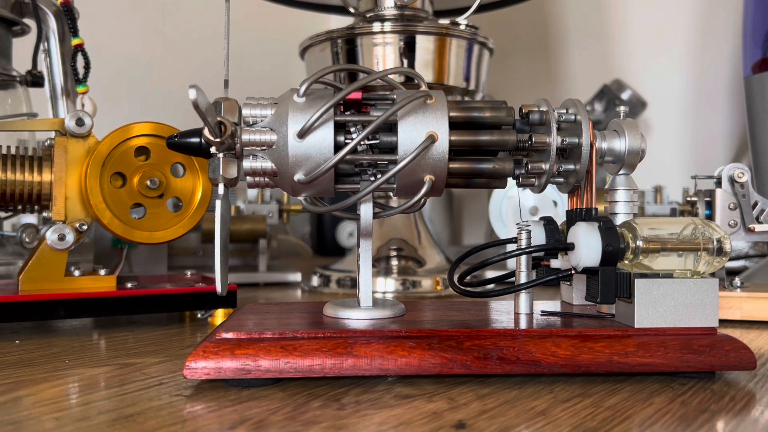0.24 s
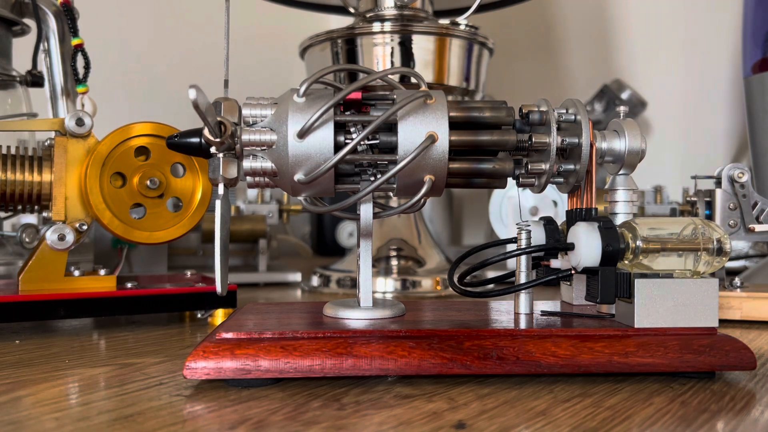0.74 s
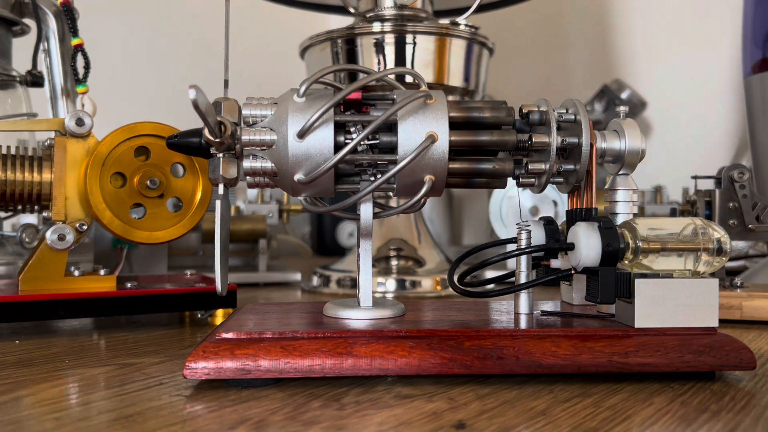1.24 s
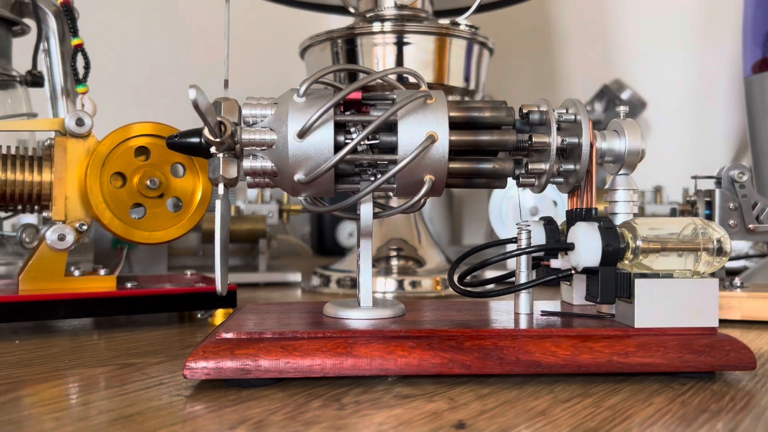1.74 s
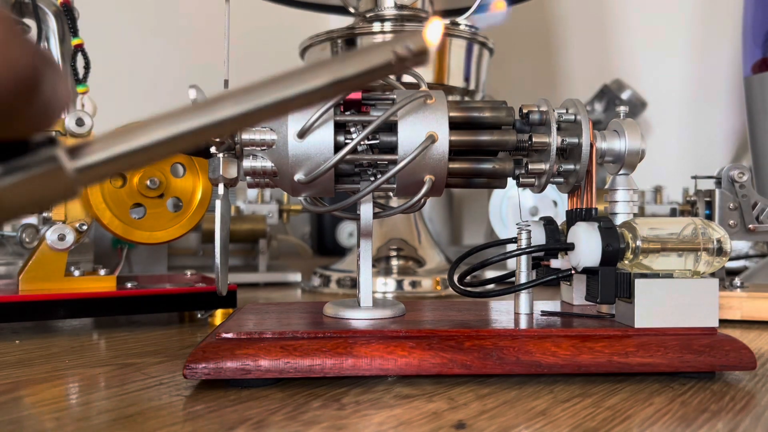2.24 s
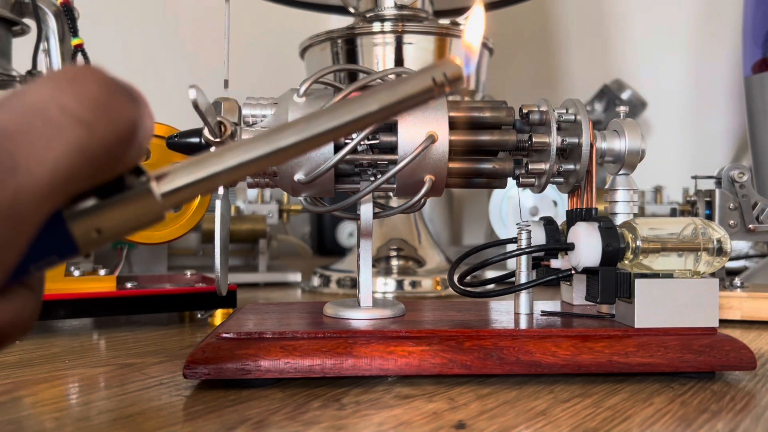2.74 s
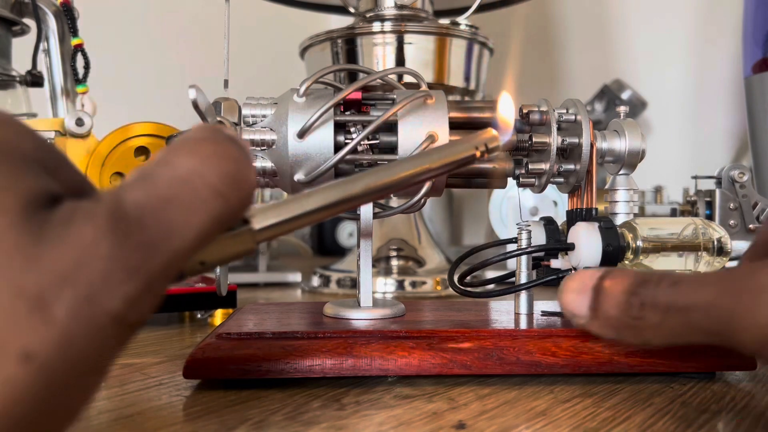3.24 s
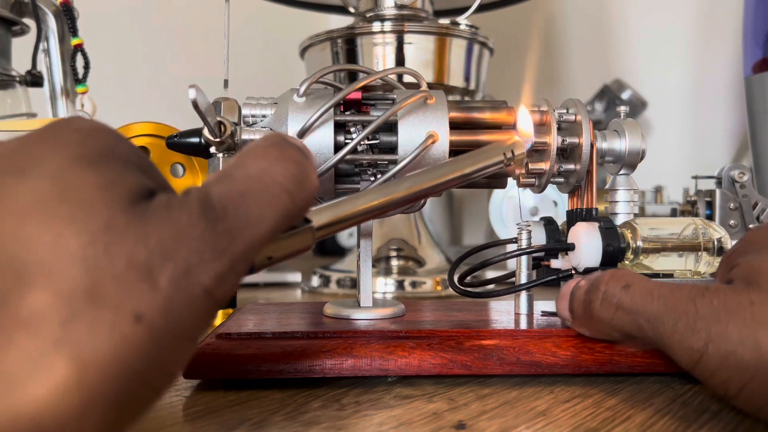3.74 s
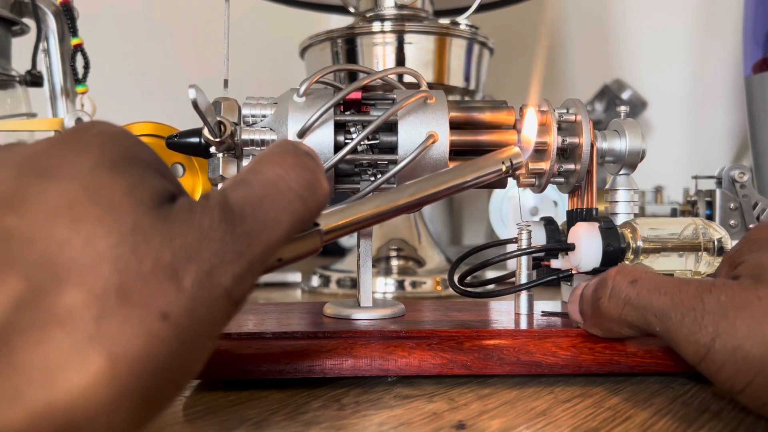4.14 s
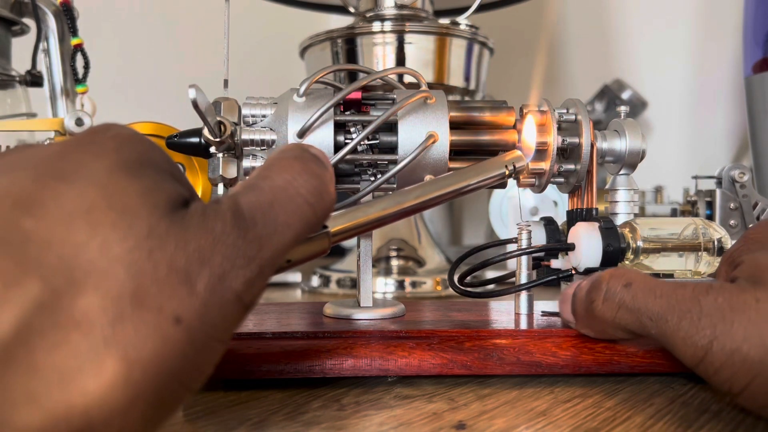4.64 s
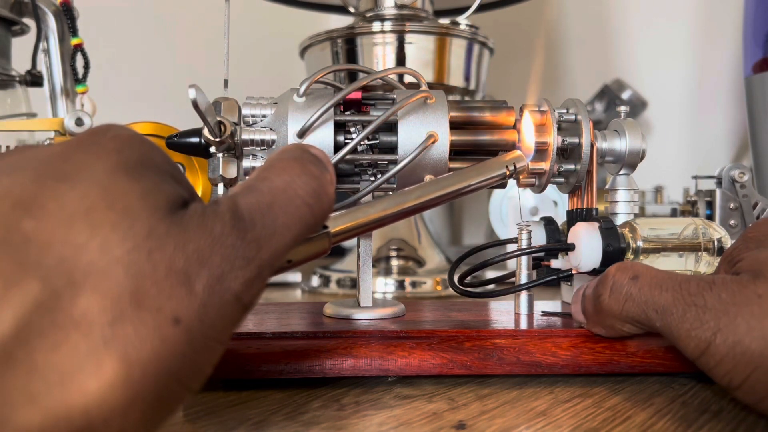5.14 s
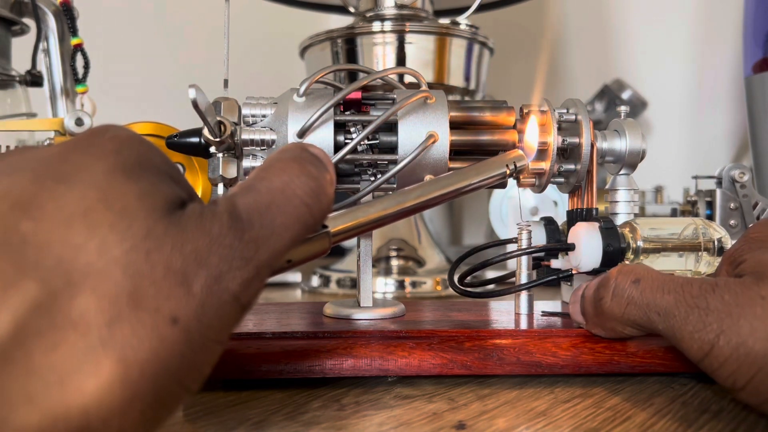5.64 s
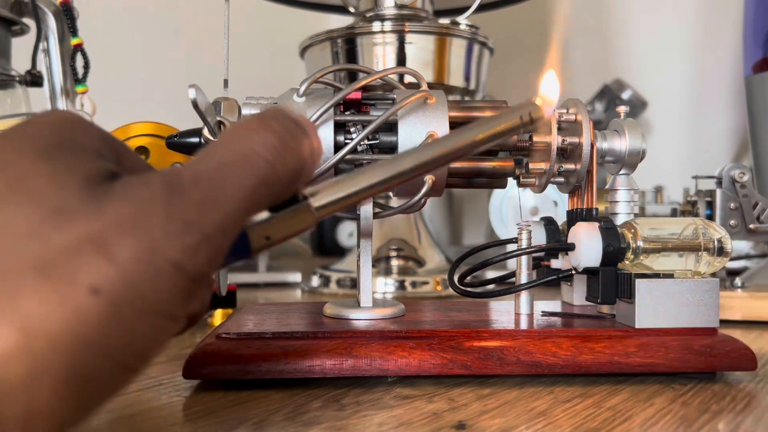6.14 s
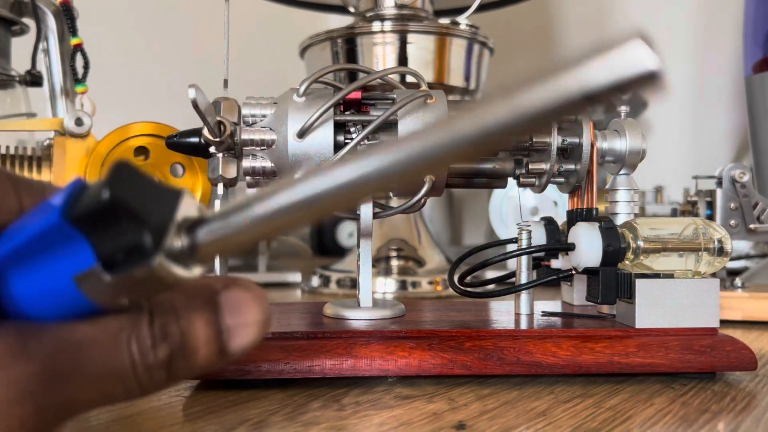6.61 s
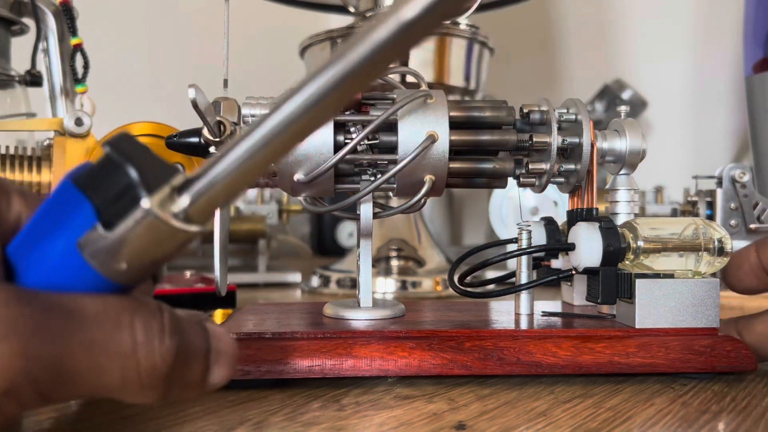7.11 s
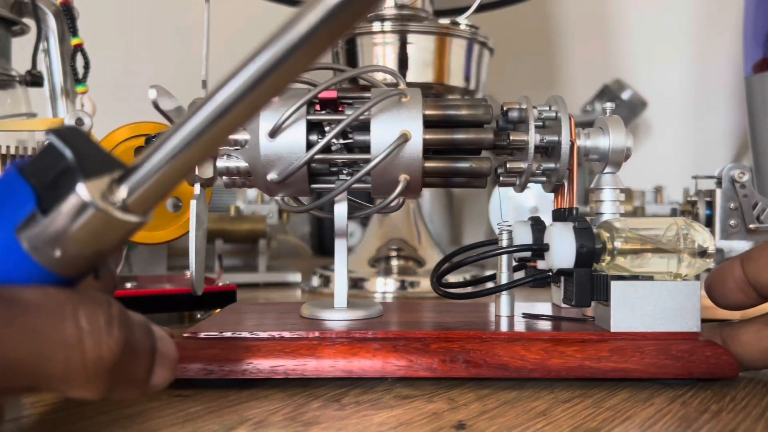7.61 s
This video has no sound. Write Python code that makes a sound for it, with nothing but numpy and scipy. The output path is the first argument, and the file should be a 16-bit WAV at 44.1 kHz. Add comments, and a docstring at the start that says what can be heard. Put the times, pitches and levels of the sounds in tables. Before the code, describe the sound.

In a quiet live room, a gas lighter clicks alight with a hiss, a stiff metal catch snaps four times, then the lighter clicks off.

```python
"""A long gas lighter is picked up, clicked alight and let go, close to a phone in a quiet, live room:
struck modes for its hammer and small contacts, shaped noise for its gas. A stiff catch on a metal model
snaps four times: ringing modes, cracks and a diffuse tail. Sleeves and skin rustle as swelling noise,
knocks ring the table top, dull thuds through the building ring wall modes, over low rumble and hiss."""
import sys
import numpy as np
from scipy import signal
from scipy.fft import rfft, irfft, next_fast_len
from scipy.io import wavfile
from scipy.ndimage import uniform_filter1d

SR = 44100
rng = np.random.default_rng(int(sys.argv[2]) if len(sys.argv) > 2 else 0)


def int16_out(signal):
    """Quantize to a 16-bit WAV file."""
    q = np.round(np.clip(np.atleast_2d(signal).T, -1, 1) * 32767)
    wavfile.write(sys.argv[1], SR, q.astype(np.int16))


N = 347063


def amp(db):
    """Amplitude gain from dB."""
    return 10 ** (np.asarray(db) / 20)


def unit(x):
    """Scale to rms 1."""
    return x / np.sqrt(np.mean(x ** 2) + 1e-20)


def along(points, hz):
    """Interpolate (freq_hz, value) points on a log frequency axis."""
    point_hz, value = np.transpose(points)
    return np.interp(np.log(hz + 1), np.log(point_hz + 1), value)


def filtered(x, response):
    """Apply a complex frequency response by FFT, zero-padded."""
    size = next_fast_len(x.shape[-1] + 8192)
    spectrum = rfft(x, size) * response(np.fft.rfftfreq(size, 1 / SR))
    return irfft(spectrum, size)[..., :x.shape[-1]]


# left-right correlation of diffuse sound: freq_hz, correlation (-1 to 1)
PORT_CORRELATION = [(30, 1), (80, 0.93), (250, 0.81), (600, 0.1), (1500, 0.48), (3000, 0.27), (6000, 0.06),
                    (8000, 0.92), (10000, 1), (11700, 1), (13500, 0.72)]


def diffuse(pair, spectrum):
    """Colour two independent signals and mix them to the port correlation of a diffuse field."""
    def response(hz):
        angle = np.arccos(np.clip(along(PORT_CORRELATION, hz), -1, 1)) / 2
        return amp(along(spectrum, hz)) * np.array([np.cos(angle), np.sin(angle)])

    mid, side = filtered(pair, response)
    return np.array([mid + side, mid - side])


def rush(spectrum, patchy_db):
    """Diffuse noise of rms 1: spectral shape plus random gain patches in time and frequency."""
    z = signal.stft(rng.standard_normal((2, N)), nperseg=512)[2]
    patches = uniform_filter1d(rng.standard_normal(z.shape[1:]), 8, axis=0)
    patches = uniform_filter1d(patches, 6, axis=1)
    pair = signal.istft(z * amp(patchy_db * unit(patches)), nperseg=512)[1][:, :N]
    return unit(diffuse(pair, [(0.82, -120)] + list(spectrum) + [(21000, -120)]))


def swells(rows, sag_db_per_s, fade_db_per_s):
    """Summed event gain: power rises linearly, sags through the hold, then fades."""
    t = np.arange(0, N / SR, .001)
    start_s, rise_s, hold_s, level_db = np.transpose(rows)[:, :, None]
    held_s = np.clip(t - start_s - rise_s, 0, hold_s)
    after_s = np.maximum(t - start_s - rise_s - hold_s, 0)
    gain = amp(level_db - sag_db_per_s * held_s - fade_db_per_s * after_s)
    power = np.clip((t - start_s) / rise_s, 0, 1) * gain ** 2
    return np.interp(np.arange(N) / SR, t, np.sqrt(power.sum(axis=0)))


# reverberation: freq_hz, t60_s
ROOM_T60 = [(150, 0.27), (800, 0.71), (2000, 0.59), (5500, 0.64), (9000, 0.52), (14000, 0.2)]


def room(x, first_wall_s, build_s, size):
    """Convolve with a random diffuse tail: silent to the first wall, then build-up and decay by band."""
    hz, t, z = signal.stft(rng.standard_normal((2, size)), SR, nperseg=256)
    decay = amp(-60 * t / along(ROOM_T60, hz)[:, None])
    tail = signal.istft(z * decay, SR, nperseg=256)[1]
    late_s = np.maximum(np.arange(tail.shape[1]) / SR - first_wall_s, 0)
    tail = diffuse(tail * (1 - np.exp(-late_s / build_s)), [(1, 0)])
    return signal.fftconvolve(x[None], tail / np.linalg.norm(tail[0]), axes=1)


# table and air resonances under a blow: freq_hz, width_hz, relative_db
THUMP_MODES = [(72, 16, 11), (121, 42, 5.5), (340, 110, -1)]
FAVOUR_WIDTH_OCTAVES = 0.33


def clicks(table, modes, colour, favour_db, thump_db, room_db, rattle_s, crack_db, spread_db,
           small_hz, size=32000):
    """Blows: a short contact rattle rings the part, thumps the table and fills the room."""
    out = np.zeros((2, N + 2 * SR))
    t = np.arange(4000) / SR
    hz, mode_db, t60_s, away_db = np.transpose(modes)[:, :, None]

    def body(f):
        total = 0
        for k, (centre_hz, width_hz, level_db) in enumerate(THUMP_MODES):
            damping = 1j * f * width_hz
            total = total + (-1) ** k * amp(level_db) * damping / (centre_hz ** 2 - f * f + damping)
        return total * (1j * f / (55 + 1j * f)) ** 4  # low cut delays the deepest part

    thump = filtered(np.exp(-t / .0004), body)
    thump = thump / np.abs(thump).max()

    def small(f):
        """Small parts radiate little bass."""
        return (1j * f / (small_hz + 1j * f)) ** 3

    def octaves(f, from_hz):
        return np.log2(np.clip(f, 1200, 13000) / from_hz)

    for start_s, level_db, favoured_hz, bright_db_per_octave in table:
        def tint(f):
            favour = np.exp(-.5 * (octaves(f, favoured_hz) / FAVOUR_WIDTH_OCTAVES) ** 2)
            return amp(along(colour, f) + bright_db_per_octave * octaves(f, 3200) + favour_db * favour)

        # random mode onsets; high modes tend to start sooner and rise faster
        rise_s = rattle_s * np.minimum(4000 / hz, 1.5)
        since_s = np.maximum(t - rise_s * rng.random(hz.shape), 0)
        envelope = amp(mode_db - 60 * since_s / t60_s) * (1 - np.exp(-since_s / rise_s))
        ring = envelope * tint(hz) * np.sin(2 * np.pi * hz * since_s)

        # direct crack: noise burst; crack into the room: impulse
        crack = rng.standard_normal(len(t)) * t / rattle_s * np.exp(-t / rattle_s)
        near = ring.sum(axis=0) + amp(crack_db) * filtered(crack, tint)
        spread = filtered(signal.unit_impulse(len(t), 60), tint)
        around = (amp(away_db) * ring).sum(axis=0) + amp(spread_db) * spread

        push = amp(level_db + thump_db) * thump
        at = round((start_s + .0012) * SR)
        out[:, at:at + len(t)] += amp(level_db + 4.5) * filtered(near, small) + push
        sent = amp(level_db + 6.5) * filtered(around, small) + 0.91 * push
        wet = amp(room_db) * room(sent, first_wall_s=0.0013, build_s=0.0035, size=size)
        out[:, at:at + wet.shape[1]] += wet
    return out[:, :N]


# rumble level: time_s, level_db
RUMBLE_LEVEL = [(0.0, -58.5), (0.39, -53), (0.7, -61), (1.01, -60), (1.44, -58), (1.6, -55.5), (2.43, -59),
                (2.61, -59), (7.87, -60)]
# noise shapes: freq_hz, relative_density_db (per Hz)
RUMBLE_SPECTRUM = [(21, -32), (36, -3), (63, -0.5), (101, -15), (123, -8), (154, -16.5), (222, -8.5),
                   (249, -14.5), (469, -21), (1010, -30), (1400, -32), (1570, -31.5), (1970, -37),
                   (2090, -36), (3500, -54), (4550, -87.5), (7700, -120)]
HISS_SPECTRUM = [(1500, -23), (3000, -1.5), (6000, -8), (8500, -9), (10000, -19), (12000, -1), (14500, -7),
                 (16500, -22)]


def rumble_and_hiss():
    """Low rumble of varying level plus steady microphone hiss, both shaped noise."""
    time_s, level_db = np.transpose(RUMBLE_LEVEL)
    rumble_db = np.interp(np.arange(N) / SR, time_s, level_db)
    rumble = amp(rumble_db) * rush(RUMBLE_SPECTRUM, patchy_db=1.5)
    return rumble + amp(-82.5) * rush(HISS_SPECTRUM, patchy_db=0.1)


# sleeve strokes, dull cloth folds, skin sliding on wood: start_s, rise_s, hold_s, level_db
SLEEVE_STROKES = [(0, 0.0019, 0.042, -67.5), (.055, 0.094, 0.21, -57), (.59, 0.027, 0.044, -73.5),
                  (.67, 0.0061, 0.0074, -66.5), (.83, .05, .02, -76.5), (.9, 0.041, 0.048, -61),
                  (1.1, 0.095, 0.041, -72), (1.26, 0.0045, 0.0062, -66.5), (1.32, 0.024, 0.1, -77),
                  (1.49, 0.066, 0.043, -71.5), (1.745, .008, .01, -63), (1.86, 0.026, .03, -73),
                  (3.76, .02, .01, -80), (6.51, 0.016, 0.0074, -70.5), (6.692, .006, .004, -85)]
CLOTH_FOLDS = [(1.2, .06, 0.034, -65), (1.5, .04, .01, -68), (1.87, .03, 0.018, -68),
               (2.83, .05, 0.052, -70), (3.2, .1, 0.084, -84.5), (3.445, .015, 0.092, -63),
               (3.74, .04, .01, -69.5), (6.78, .04, 0.039, -68.5), (6.92, .07, 0.032, -67.5)]
SKIN_SLIDES = [(6.96, 0.018, 0.029, -77), (7.41, 0.046, 0.058, -62), (7.56, 0.038, 0.017, -67),
               (7.68, 0.027, 0.012, -74.5)]
# noise shapes: freq_hz, relative_density_db (per Hz)
RUB_SPECTRUM = [(1200, -33), (2200, 1.5), (4500, -0.35), (7000, -5), (9500, -16.5), (12000, -40.5)]
CLOTH_SPECTRUM = [(300, -31.5), (600, -0.3), (1200, -6.5), (2200, -11), (3500, -37.5)]
SKIN_SPECTRUM = [(5000, -36), (8000, 0.5), (10000, -11), (12500, 1.5), (15000, -6), (17000, -27.5)]
# side noises: cloth and skin under a stroke, rub under a slide
STROKE_CLOTH_DB, STROKE_SKIN_DB, SLIDE_RUB_DB = -1.5, -7.5, -6.5
FADE_DB_PER_S, SLIDE_FADE_DB_PER_S = 115, 252


def hands():
    """Friction noise: cloth folds dully, fabric rubs, skin slides with a bright hiss; powers add."""
    strokes = swells(SLEEVE_STROKES, 0, FADE_DB_PER_S)
    folds = swells(CLOTH_FOLDS, 0, FADE_DB_PER_S)
    slides = swells(SKIN_SLIDES, 0, SLIDE_FADE_DB_PER_S)
    rub = np.hypot(strokes, amp(SLIDE_RUB_DB) * slides) * rush(RUB_SPECTRUM, patchy_db=2.0)
    cloth = np.hypot(folds, amp(STROKE_CLOTH_DB) * strokes) * rush(CLOTH_SPECTRUM, patchy_db=4.5)
    skin = np.hypot(slides, amp(STROKE_SKIN_DB) * strokes) * rush(SKIN_SPECTRUM, patchy_db=3.0)
    return rub + cloth + skin


# far blows: start_s, level_db (nominal), upper_modes_db (above 400 Hz)
FAR_THUDS = [(0.249, -45, 4.5), (1.269, -45, -4.5), (1.525, -50, -5.5), (1.89, -41.5, -6),
             (2.424, -39.5, -19), (5.136, -50, -6.5), (6.19, -50, -14), (6.984, -57, -0.5)]
# wall and floor modes: freq_hz, relative_db, t60_s
WALL_MODES = [(68, 5, .6), (128, -5.5, 0.66), (167.5, -6, 1), (218, 3.9, 0.64), (294, -6.5, 0.92),
              (388, -11, 0.56), (401, 7, 0.17), (486, -3, 0.95), (550, -5.5, 0.39), (606, -1, .4),
              (662, 7, 0.23), (757, -1.5, 0.66), (858, 6.5, 0.1)]


def thuds():
    """Far blows ring wall and floor modes; soft onset, random phase drift per port gives uneven beats."""
    out = np.zeros((2, N + SR))
    t = np.arange(SR // 2) / SR
    hz, mode_db, t60_s = np.transpose(WALL_MODES)[:, :, None]
    for start_s, level_db, upper_db in FAR_THUDS:
        scatter_db = rng.normal(0, 2.5, hz.shape)
        strength = amp(level_db - 11.5 + mode_db + upper_db * (hz > 400) + scatter_db)
        steps = rng.normal(0, 0.018, (2, len(hz), len(t)))
        drift = np.cumsum(steps, axis=2) * np.sqrt(hz / 400)
        phase = 2 * np.pi * (hz * t + rng.random(hz.shape)) + drift
        ring = strength * amp(-60 * t / t60_s) * np.sin(phase)
        at = round(start_s * SR)
        out[:, at:at + len(t)] += ring.sum(axis=1) * (1 - np.exp(-t / 0.0164))
    return out[:, :N]


# trigger, spring and handle contacts; spark hammer:
# start_s, level_db (nominal), favoured_pitch_hz, brightness_db_per_octave
LIGHTER_TICKS = [(0.6816, -51, 1780, 0), (1.264, -50.5, 4500, -4), (1.5431, -49.5, 2270, -6),
                 (1.5617, -52, 4960, 0.5), (1.5776, -49, 5930, 1), (1.5974, -50.5, 7200, 0.5),
                 (1.7493, -39.5, 2130, -3.5), (1.9304, -53, 7440, 3.5), (2.0456, -43.5, 3150, 0),
                 (2.0747, -58.5, 7400, 3), (2.0995, -53.5, 2500, 1), (2.117, -45, 2503, -0.5),
                 (2.1677, -32.5, 3135, 5), (6.0952, -31.5, 3600, 1.5), (6.1515, -18, 3800, 2),
                 (6.2234, -44.5, 3200, -1.5), (6.2341, -46, 3250, -0.5), (6.3431, -42, 3700, -1),
                 (6.351, -51, 3175, -5), (6.5154, -54, 3000, -3), (6.544, -44.5, 1200, 0.5),
                 (6.5577, -41, 5700, -1.5)]
SPARK_HAMMER = [(2.2033, -2.5, 3200, 0.0024)]
# lighter modes: freq_hz, relative_db, t60_s, toward_walls_db (relative to toward the phone)
LIGHTER_BODY_MODES = [(1221, 8.6, 0.013, -2), (1970, 2.8, 0.0063, 4.5), (2910, 7.9, 0.01, -6.5),
                      (3680, 9, 0.0093, -8.5), (4000, 14, 0.0029, -7.5), (5200, 5, .004, 8.5),
                      (9000, 11, 0.0014, -2), (11400, 6.1, 0.0041, -3), (13900, 9.3, .002, -1.5)]
# strike strength: freq_hz, relative_db
SPARK_STRIKE = [(1200, -22.5), (1600, -18.5), (2100, -26), (2900, -12.5), (4000, -24.5), (5300, -21.5),
                (7300, -23.5), (13000, -12.5)]
TICK_STRIKE = [(1200, -13.5), (1700, -16.5), (3200, -18), (5000, -27), (7300, -19.5), (13000, -19)]
# gas as the flame catches and as the valve closes: start_s, rise_s, hold_s, level_db
GAS_PUFFS = [(2.2, 0.0036, 0.39, -50), (5.97, .03, .07, -68)]
# gas noise shape: freq_hz, relative_density_db (per Hz)
GAS_SPECTRUM = [(500, -32.5), (1500, -5.5), (3000, -18), (6000, 2.5), (9000, -8.5), (13000, -8),
                (16500, -29)]
GAS_SAG_DB_PER_S, GAS_FADE_DB_PER_S = 46.5, 167


def lighter():
    """Spark hammer and small contacts ring the lighter body; gas is swelling turbulent noise."""
    body = dict(rattle_s=0.00057, small_hz=800)
    spark = clicks(SPARK_HAMMER, LIGHTER_BODY_MODES, SPARK_STRIKE, favour_db=0.5, thump_db=-30.5,
                   room_db=-7, crack_db=9.5, spread_db=20.5, **body)
    ticks = clicks(LIGHTER_TICKS, LIGHTER_BODY_MODES, TICK_STRIKE, favour_db=6.5, thump_db=-28.5,
                   room_db=-16, crack_db=13.5, spread_db=22.5, size=17000, **body)
    gas = swells(GAS_PUFFS, GAS_SAG_DB_PER_S, GAS_FADE_DB_PER_S) * rush(GAS_SPECTRUM, patchy_db=3.4)
    return spark + ticks + gas


# table knocks: start_s, level_db (nominal), favoured_pitch_hz, brightness_db_per_octave
TABLE_KNOCKS = [(1.27, -46, 4000, -1.7), (1.503, -49.5, 3200, 0), (1.535, -53, 1200, 0),
                (6.985, -49.5, 3200, -2.6)]
# table top modes: freq_hz, relative_db, t60_s, toward_walls_db (relative to toward the phone)
TABLE_TOP_MODES = [(543, -1, 0.096, -1.6), (670, -1.5, 0.089, -1.5), (805, -6.5, .06, -1.6),
                   (870, 0.5, 0.014, -1.5), (1091, -6, 0.036, -1.5), (1280, -6.5, 0.045, -1.5),
                   (2200, 1, 0.0078, -1.5), (3170, 6.5, 0.0064, -1.5), (4308, 8, 0.0045, -1.5)]
# strike strength: freq_hz, relative_db
KNOCK_STRIKE = [(1200, -9), (1700, -31.5), (3200, -20), (5000, -22), (7300, -27), (13000, -35)]


def table_knocks():
    """Light blows ring the table top modes, with a strong thump."""
    return clicks(TABLE_KNOCKS, TABLE_TOP_MODES, KNOCK_STRIKE, favour_db=4.5, thump_db=-1.5, room_db=-9,
                  rattle_s=0.00047, crack_db=21, spread_db=8.5, small_hz=257.4, size=20000)


# catch touched, snapping in, snapping back:
# start_s, level_db (nominal), favoured_pitch_hz, brightness_db_per_octave
CATCH_TOUCHES = [(3.638, -37.5, 3010, -3.5), (3.749, -60, 3700, 0.5), (3.7744, -57.5, 4505, 0.5),
                 (5.3627, -52.5, 1700, -1), (5.6802, -49, 1697, 3), (5.73, -67.5, 8020, 5.5),
                 (5.88, -50, 3400, 0), (5.9802, -38.5, 5940, 6)]
SNAPS_IN = [(3.9251, -3, 5200, 0.5), (4.7547, -3, 4587, -0.5)]
SNAPS_BACK = [(4.5471, -15.5, 1720, -0.87), (5.7798, -14, 4600, 0), (5.7901, -29, 1200, -1.3)]
# catch modes: freq_hz, relative_db, t60_s, toward_walls_db (relative to toward the phone)
CATCH_BODY_MODES = [(1157.5, 5.5, 0.022, -7.5), (1620, 10, .014, 0), (2000, -3.5, 0.002, -0.5),
                    (3150, 6.5, 0.01, -1.5), (3210, 5, 0.0066, 5.5), (4150, -5.5, 0.018, -2),
                    (4780, 6.5, 0.007, 1.5), (5100, 1, 0.006, 0), (6485, 4.5, 0.0055, 0),
                    (7290, 3.5, 0.0063, -0.5), (8420, 5, 0.0065, -2.5), (9100, 5, 0.0013, -7),
                    (11400, 0.5, 0.0025, 0.5), (12200, 5, 0.003, -2), (14100, 3.5, 0.0019, -2.5)]
# strike strength: freq_hz, relative_db
TOUCH_STRIKE = [(1200, -18.5), (1700, -12), (2500, -11.5), (3200, -23.5), (4100, -9.5), (5000, -24),
                (7300, -24.5), (13000, -26)]
IN_STRIKE = [(1200, -25.5), (1700, -20), (2300, -20.5), (3200, -16), (5000, -15.5), (7300, -14),
             (13000, -17.5)]
BACK_STRIKE = [(1200, -14), (1700, -15), (2300, -15), (3200, -18), (5000, -20.5), (7300, -25),
               (13000, -18.5)]


def catch():
    """One set of metal modes: ticks when touched, snaps in hard and bright, snaps back duller."""
    part = dict(rattle_s=.0008, small_hz=900)
    touches = clicks(CATCH_TOUCHES, CATCH_BODY_MODES, TOUCH_STRIKE, favour_db=6, thump_db=-23.5,
                     room_db=-13.5, crack_db=13, spread_db=21.5, size=14000, **part)
    snaps_in = clicks(SNAPS_IN, CATCH_BODY_MODES, IN_STRIKE, favour_db=1.5, thump_db=-30.5,
                      room_db=-1.5, crack_db=12.5, spread_db=18, **part)
    snaps_back = clicks(SNAPS_BACK, CATCH_BODY_MODES, BACK_STRIKE, favour_db=6, thump_db=-26,
                        room_db=-11, crack_db=16, spread_db=27, **part)
    return touches + snaps_in + snaps_back


def scene():
    """Sum of all sources."""
    return rumble_and_hiss() + hands() + thuds() + lighter() + table_knocks() + catch()


# port level difference: freq_hz, left_over_right_db
PORT_LEVEL = [(120, 0), (300, 0.1), (1400, 2.2), (3400, 3.5), (4500, 5), (5500, 6.5), (6500, 5.5),
              (7600, 2), (9000, -0.24)]
# port phase difference: freq_hz, phase_rad
PORT_PHASE = [(0, -.03), (300, -.3), (1400, .2), (3400, -1.2), (4500, -.9), (5500, -.1), (7200, .2),
              (10200, 3.14), (13400, 6.28), (17000, 9.6)]
TOP_HZ = 16900


def record(dry):
    """Two ports differ in level and phase with pitch; peaks round off; band-limited at TOP_HZ."""
    def half(hz):
        phase_rad = np.interp(hz, *np.transpose(PORT_PHASE))
        return amp(along(PORT_LEVEL, hz) / 2) * np.exp(-.5j * phase_rad)

    ports = filtered(dry, lambda hz: np.array([half(hz), 1 / half(hz)]))
    rounded = ports / (1 + (ports / .93) ** 6) ** (1 / 6)
    return filtered(rounded, lambda hz: hz < TOP_HZ)


dry = scene()
out = record(dry)
int16_out(out)
```